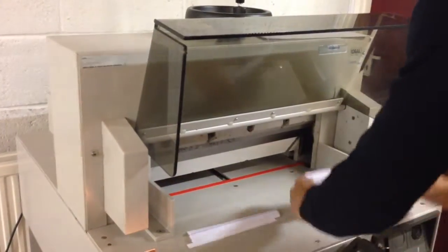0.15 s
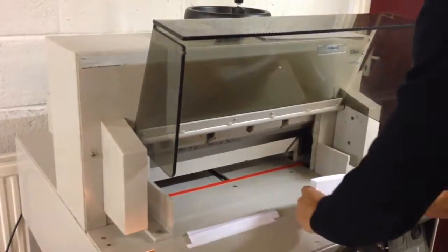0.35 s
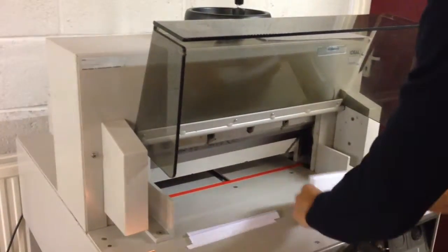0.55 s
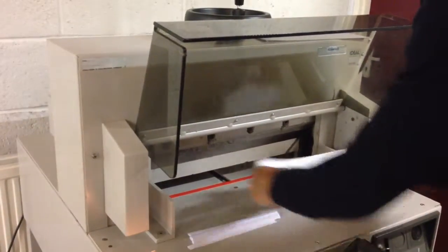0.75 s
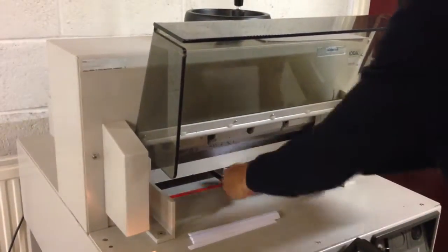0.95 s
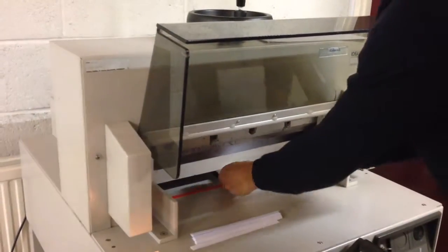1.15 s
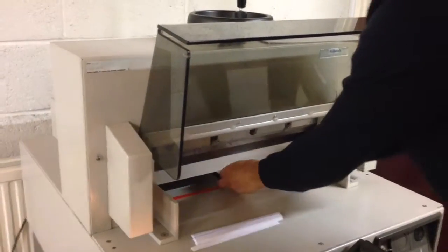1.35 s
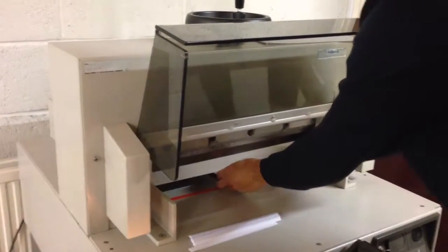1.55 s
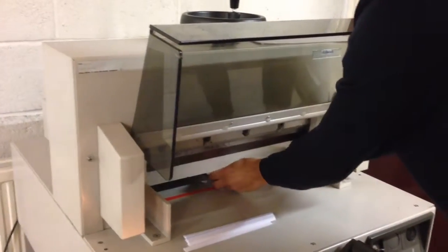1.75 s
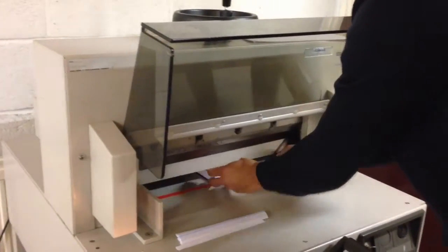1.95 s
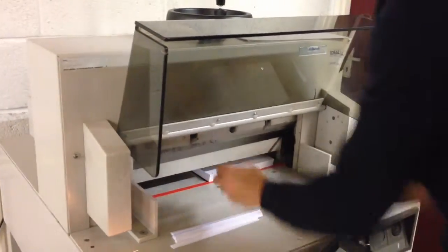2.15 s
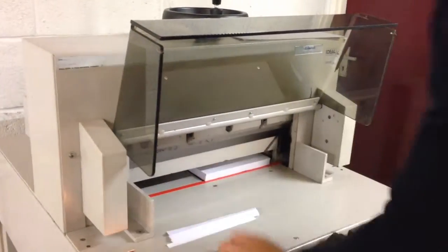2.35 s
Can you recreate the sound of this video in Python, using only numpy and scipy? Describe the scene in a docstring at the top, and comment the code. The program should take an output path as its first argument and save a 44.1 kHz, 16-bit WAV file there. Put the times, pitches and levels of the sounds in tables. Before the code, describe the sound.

After a faint paper rub and tick, a heavy metal machine clanks sharply and its cabinet booms; quiet paper rubs, soft bumps and a brief squeak follow over low steady hum, indoors, mono.

```python
"""A heavy steel paper guillotine is handled in a small hard-walled room, one microphone, over steady low noise.
Paper rubs (shaped noise), an edge tick and a tiny chirp (falling sine) come before one rattling clank.
The clank is a run of noise cracks; panels clang, the cabinet booms (decaying sines) and the room answers.
Then a paper stack slides over the table in soft rubs and bumps, with a short rough stick-slip squeak
(wavering harmonics and noise) as it is pushed; more rubs and one tick follow."""
import sys
import numpy as np
from scipy import signal
from scipy.fft import rfft, irfft
from scipy.io import wavfile
from scipy.ndimage import uniform_filter1d

SR = 44100
rng = np.random.default_rng(int(sys.argv[2]) if len(sys.argv) > 2 else 0)


def pcm_store(signal):
    """Save signal as 16-bit PCM."""
    levels = np.round(np.clip(np.atleast_2d(signal), -1, 1) * 32767)
    wavfile.write(sys.argv[1], SR, levels.astype(np.int16).T)


N = 105840
T = np.arange(N) / SR  # time [s]

# steady background noise: (frequency [Hz], level [dB])
FLOOR_SPECTRUM = [(15, -45.5), (25, -12.5), (112, -2.5), (186, -5), (224, -6.5), (354, -8.5), (383, -5),
                  (438, -20), (475, -9.5), (1280, -19), (1390, -15.5), (2430, -14.5), (15000, -18.5)]
FLOOR_DB = -66.5

# paper sliding on the table:
# (crest time [s], rise [s], fall [s], hiss level [dB], hollow rub level [dB])
SLIDES = [(0.038, 0.013, 0.012, -70, -73), (.63, 0.023, 0.029, -64, -69), (.88, 0.017, .03, -71, -72.5),
          (1.091, 0.048, 0.024, -61.5, -72), (1.251, .06, .05, -72.5, -75.5),
          (1.925, 0.028, 0.028, -84.5, -70.5), (2.1, .05, 0.052, -73, -72),
          (2.392, 0.041, 0.026, -57.5, -64.5)]
# hiss of the sliding sheets: (frequency [Hz], level [dB])
HISS_SPECTRUM = [(300, -10), (1000, -5.5), (2000, -3), (4000, -0.5), (8000, -9), (15000, -13.5)]
# hollow rub of the stack: (frequency [Hz], level [dB])
RUB_SPECTRUM = [(100, -22.5), (250, -7), (400, 7), (650, -7.5), (1400, -1), (3000, -40), (8000, -22)]
# soft bumps against the table: (time [s], frequency [Hz], level [dB])
BUMPS = [(1.044, 404, -60), (1.118, 438, -64), (1.282, 141.4, -61.5)]
BUMP_HALF_S = .01

# light ticks of the paper's edge on the steel: (time [s], level [dB])
TICKS = [(0.0346, -58), (1.9435, -51)]
# colour of a tick: (frequency [Hz], level [dB])
TICK_SPECTRUM = [(200, -17), (800, -4), (1300, 1), (2500, -1.5), (4000, -8.5), (10000, -21)]
TICK_T60_S = 0.011

# tiny falling chirp: (time [s], length [s], start pitch [Hz], end pitch [Hz])
CHIRP = (.101, .009, 2800, 1650)

# metal contacts of the clank: (time [s], relative level [dB], brightness [dB per octave])
CONTACTS = [(0.209, -44, -1), (0.2156, -42.5, -2.5), (0.22, -22.5, -6.5), (.2226, -31, -4),
            (0.2265, -19.5, -2), (0.2315, -7, 2.5), (0.2333, -0.5, 3), (0.2369, -10.5, 3), (0.2407, 3, 0.5),
            (0.2438, -1, -5), (0.245, -10.5, -5.5), (.2502, -12, -0.5), (0.2641, -13.5, -5)]
PIVOT_HZ = 2500  # the brightness tilt turns about this frequency
# colour of a contact's crack before the tilt: (frequency [Hz], level [dB])
CRACK_SPECTRUM = [(150, -27), (250, -7.5), (488, -4), (844, -14), (1820, -3.5), (2130, -5.5), (2610, -19),
                  (3210, -1.5), (4760, -9.5), (6370, -12.5), (7560, -20), (9610, -26.5), (15000, -40.5)]
CRACK_DB, CRACK_T60_S, CRACK_RISE_S = -9.5, 0.017, 0.00044
# dense ring of the panels and the room: (frequency [Hz], level [dB])
CLANG_SPECTRUM = [(40, -18.5), (80, -26), (150, -9.5), (250, -2), (330, -3), (400, 2), (620, -0.5),
                  (760, -4.5), (1350, 0.5), (1650, -2.5), (2150, -2), (2700, -7.5), (3200, -2.5),
                  (4500, -13), (6700, -12.5), (7500, -21), (8500, -17.5), (11000, -27.5), (15000, -34)]
# its decay, also used for the room's answer: (frequency [Hz], T60 [s])
CLANG_T60 = [(60, .3), (150, .7), (400, .56), (700, .45), (1500, .42), (3300, .39), (5000, .36),
             (8000, 0.25), (14000, 0.091)]
CLANG_DB, CLANG_RISE_S = -28, .004

# the heavy blow that shakes the cabinet
BLOW_S, BLOW_RISE_S = .2338, 0.014
# cabinet modes: (frequency [Hz], level [dB], T60 [s])
CABINET_MODES = [(55, -40.5, .12), (138.8, -35.5, 1), (161, -37, 1), (175.7, -29.5, 0.66),
                 (233.7, -31, .62), (246, -10, 0.052), (286.4, -37.5, 0.79), (373.4, -31.5, .62),
                 (412, -8, 0.074), (484.5, -38, 0.76), (538.8, -34, 0.32)]
CABINET_LOW_CUT_HZ, CABINET_ROOM_DB = 66, -17
# steel panel modes: (frequency [Hz], level [dB], T60 [s])
PANEL_MODES = [(1153, -42, 0.55), (1337, -33, .33), (1456, -33.5, 0.1), (1814, -37.5, 0.19),
               (2020, -40, 0.24), (2102, -28, .26), (2290, -25, 0.15), (2445, -40.5, .3), (3185, -41, 0.15),
               (3300, -35.5, .3), (3750, -38.5, .27), (4520, -40, 0.17)]
# the cabinet's main boom: a heavy first swing, then a long ring that throbs
THUD_S, THUD_HALF_S, THUD_HZ, THUD_DB = .254, .016, 152.3, -17
BOOM_HZ, BOOM_DB, BOOM_T60_S = 153.5, -28, 1.18
# throb of the boom, on top of its decay: (time [s], level [dB])
THROB = [(.285, -8), (.32, -3.5), (0.387, -19), (0.413, 3.5), (.46, -20), (.54, -0.5), (.572, -38),
         (.615, 7), (0.654, -25), (.69, 4.5), (.725, -16), (0.766, 5), (.86, 2), (.96, -2.5)]

# squeak of the stack as it is pushed: (time [s], pitch [Hz], relative level [dB])
SQUEAK = [(1.5147, 1110, -68), (1.518, 1141, -45), (1.522, 1352, -46.5), (1.526, 1603, -39.5),
          (1.530, 1476, -54.5), (1.533, 1084, -44.5), (1.536, 849, -44.5), (1.545, 887, -48),
          (1.55, 748, -58), (1.56, 580, -63)]
SQUEAK_OVERTONE_DB = -10  # per octave above the fundamental
SQUEAK_JITTER = 0.0699  # rms pitch wander, as a fraction of the pitch
SQUEAK_GRIT = 0.46  # rms of the noise mixed with the slips
# colour of the rubbing drive: (frequency [Hz], level [dB])
SQUEAK_COLOUR = [(100, -8), (400, 11), (900, -2.5), (3600, 3.5), (4300, -7.5), (9000, -36)]
# table modes: (frequency [Hz], relative level [dB], T60 [s])
TABLE_MODES = [(830, -3, .05), (1042, 2.5, 0.093), (1500, 4, 0.067), (3240, 2, .04)]
SQUEAK_BODY_DB, SQUEAK_ROOM_DB = -50, -12
# table modes ringing directly, swelling in during the squeak
TABLE_RING_S, TABLE_RING_DB, TABLE_RING_RISE_S = 1.526, -38, .01
# reflections off the guard and the wall: (delay [s], level [dB])
ECHOES = [(.0052, -13), (0.0108, -8.5), (0.0182, -31), (.026, -17)]

EDGE_HZ = 15300  # upper limit of the recorder


def amp(db):
    """Decibels to gain."""
    return 10 ** (np.asarray(db) / 20)


def unit(x):
    """Scales to rms 1."""
    return x / np.sqrt(np.mean(x ** 2) + 1e-20)


def read(points, hz):
    """Reads a table on a log-frequency axis."""
    table_hz, value = np.transpose(points)
    return np.interp(np.log(hz + 1), np.log(table_hz + 1), value)


def add(mix, s, sound):
    """Mixes a sound in at time s, in place."""
    start = max(round(s * SR), 0)
    part = mix[start:][:len(sound)]
    part += sound[:len(part)]


def colour(x, points, tilt_db=0):
    """Filters by a spectrum, tilted in dB per octave."""
    hz = np.fft.rfftfreq(len(x), 1 / SR)
    octaves = np.log2(np.maximum(hz / PIVOT_HZ, .1))
    gain = amp(read(points, hz) + tilt_db * octaves)
    return irfft(rfft(x) * gain, len(x))


def noise(points):
    """Coloured noise of rms 1."""
    return unit(colour(rng.standard_normal(N), points))


def fade(t, t60):
    """Exponential decay that loses 60 dB in t60 seconds."""
    return np.exp(-np.log(1000) * t / np.maximum(t60, 1e-4))


def swell_in(t, rise_s):
    """Exponential approach to full level."""
    return 1 - np.exp(-t / rise_s)


def ring(modes):
    """Ringing resonances: a sum of dying sines."""
    return sum(amp(db) * fade(T, t60) * np.sin(2 * np.pi * hz * T) for hz, db, t60 in modes)


def tail(x):
    """Lets each band of a noise die at the speed of the panels and room."""
    hz, t, bands = signal.stft(x, SR, nperseg=512)
    bands = bands * fade(t, read(CLANG_T60, hz)[:, None])
    dying = signal.istft(bands, SR, nperseg=512)[1][:N]
    return dying * swell_in(T, CLANG_RISE_S)


def room(x):
    """The room's diffuse answer: the sound convolved with a dying noise of unit energy."""
    echo = tail(rng.standard_normal(N))
    return signal.fftconvolve(x, echo / np.linalg.norm(echo))[:N]


def thump(s, hz, db, half_s):
    """A heavily damped low resonance: a few cycles under a bell-shaped envelope."""
    bell = np.exp(-((T - s) / half_s) ** 2)
    return amp(db) * bell * np.cos(2 * np.pi * hz * (T - s))


def background():
    """Steady coloured noise under everything."""
    return amp(FLOOR_DB) * noise(FLOOR_SPECTRUM)


def paper(grain_db=4.0, room_db=-7):
    """Friction as grainy hiss and a hollow rub that swell with each slide; the stack bumps softly."""
    hiss, rub = noise(HISS_SPECTRUM), noise(RUB_SPECTRUM)
    flutter = unit(uniform_filter1d(rng.standard_normal(N), size=90))  # smoothed over 2 ms
    grain = unit(amp(grain_db * flutter))
    out = sum(thump(s, hz, db, BUMP_HALF_S) for s, hz, db in BUMPS)
    for s, rise, fall, hiss_db, rub_db in SLIDES:
        swell = np.exp(-((T - s) / np.where(T < s, rise, fall)) ** 2)
        friction = amp(hiss_db) * hiss * grain + amp(rub_db) * rub
        out = out + swell * friction
    return out + amp(room_db) * room(out)


def ticks(room_db=-7):
    """Light edge contacts: short snaps of dying noise and the room's answer."""
    out = np.zeros(N)
    for s, db in TICKS:
        snap = noise(TICK_SPECTRUM) * fade(T, TICK_T60_S)
        add(out, s, amp(db) * snap)
    return out + amp(room_db) * room(out)


def chirp(s, length, from_hz, to_hz, db=-58):
    """A tiny squeak: a sine that falls in pitch under a half-sine envelope."""
    out = np.zeros(N)
    progress = np.arange(0, 1, 1 / (length * SR))
    turns = np.cumsum(from_hz + (to_hz - from_hz) * progress) / SR
    add(out, s, amp(db) * np.sin(np.pi * progress) * np.sin(2 * np.pi * turns))
    return out


def clatter():
    """Each metal contact cracks and feeds the dense ring of panels and room."""
    cracks, blows, t = np.zeros(N), np.zeros(N), T[:4096]
    for s, db, tilt_db in CONTACTS:
        signs = rng.choice([-1., 1.], len(t))
        crack = unit(colour(signs, CRACK_SPECTRUM, tilt_db))
        envelope = fade(t, CRACK_T60_S) * swell_in(t, CRACK_RISE_S)
        add(cracks, s, amp(db) * crack * envelope)
        add(blows, s, amp([db]))  # one impulse per contact
    clang = signal.fftconvolve(blows, tail(noise(CLANG_SPECTRUM)))[:N]
    return amp(CRACK_DB) * cracks + amp(CLANG_DB) * clang


def cabinet():
    """The blow thuds through the frame; the cabinet booms and throbs under its higher modes and the panels."""
    body, boom, panels = np.zeros((3, N))
    rise = swell_in(T, BLOW_RISE_S)
    add(body, BLOW_S, ring(CABINET_MODES) * rise)
    add(panels, BLOW_S, ring(PANEL_MODES))
    add(boom, BLOW_S, ring([(BOOM_HZ, BOOM_DB, BOOM_T60_S)]) * rise)
    low_cut = signal.butter(2, CABINET_LOW_CUT_HZ, "highpass", fs=SR, output="sos")
    body = signal.sosfilt(low_cut, body)
    throb_s, throb_db = np.transpose(THROB)
    boom = boom * np.interp(T, throb_s, amp(throb_db))
    thud = thump(THUD_S, THUD_HZ, THUD_DB, THUD_HALF_S)
    return panels + body + amp(CABINET_ROOM_DB) * room(body) + boom + thud


def squeak():
    """A rough stick-slip tone rises and drops in pitch, with table modes and echoes off nearby surfaces."""
    s, hz, db = np.transpose(SQUEAK)
    wander, grit = rng.standard_normal((2, N))
    jitter = SQUEAK_JITTER * unit(uniform_filter1d(wander, size=40))  # smoothed over 0.9 ms
    turns = np.cumsum(np.interp(T, s, hz) * (1 + jitter)) / SR
    slips = sum(amp(SQUEAK_OVERTONE_DB * np.log2(k)) * np.sin(2 * np.pi * k * turns) for k in range(1, 6))
    level = amp(np.interp(T, s, db)) * (T > s[0]) * (T < s[-1])
    drive = colour((slips + SQUEAK_GRIT * grit) * level, SQUEAK_COLOUR)
    table = ring(TABLE_MODES)
    out = drive + amp(SQUEAK_BODY_DB) * signal.fftconvolve(drive, table)[:N]
    add(out, TABLE_RING_S, amp(TABLE_RING_DB) * table * swell_in(T, TABLE_RING_RISE_S))
    for delay, echo_db in ECHOES:
        add(out, delay, amp(echo_db) * drive)
    return out + amp(SQUEAK_ROOM_DB) * room(drive)


def scene():
    """Background noise, paper, ticks, chirp, clank, cabinet and squeak on one channel."""
    light_sounds = background() + paper() + ticks() + chirp(*CHIRP)
    mix = light_sounds + clatter() + cabinet() + squeak()
    return mix[None]


def record(dry):
    """The recorder's band limit: a steep low-pass."""
    lowpass = signal.firwin(511, EDGE_HZ, window=("kaiser", 9), fs=SR)
    return signal.oaconvolve(dry, lowpass[None], "same")


dry = scene()
out = record(dry)
pcm_store(out)
```